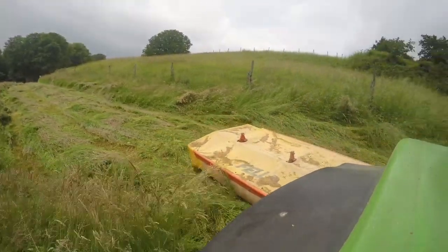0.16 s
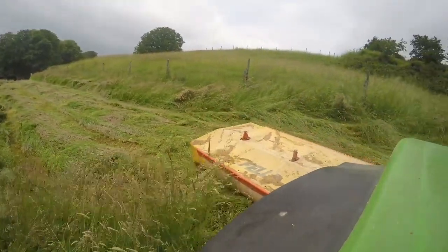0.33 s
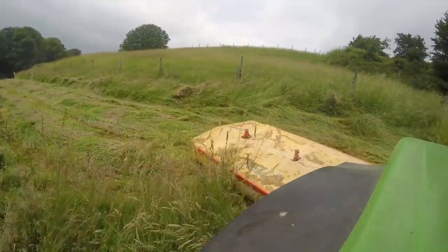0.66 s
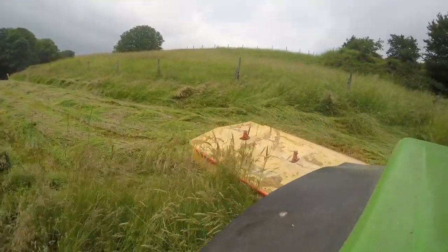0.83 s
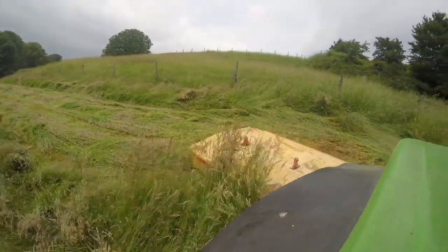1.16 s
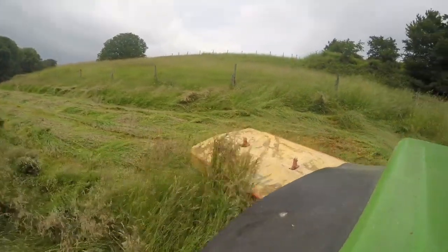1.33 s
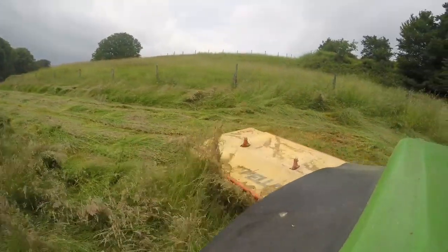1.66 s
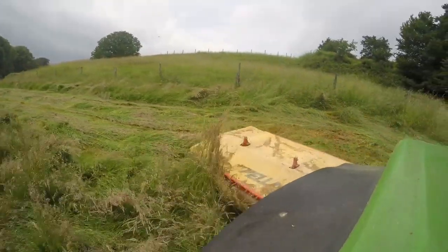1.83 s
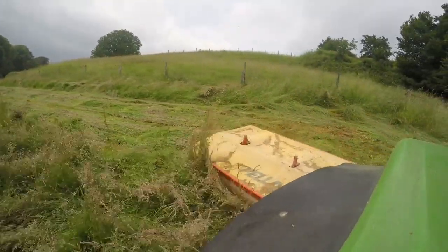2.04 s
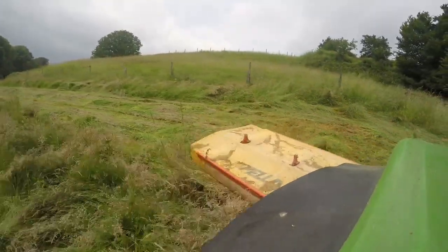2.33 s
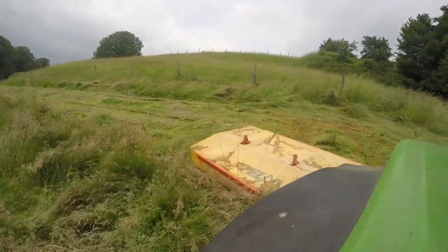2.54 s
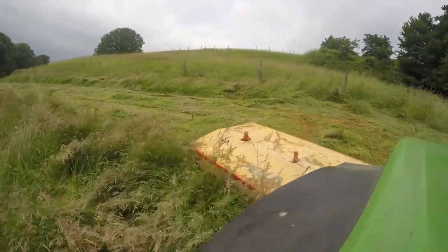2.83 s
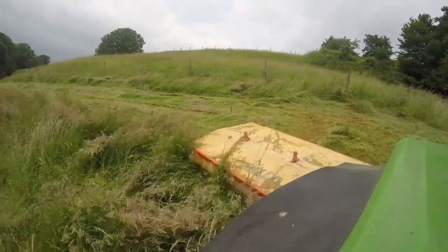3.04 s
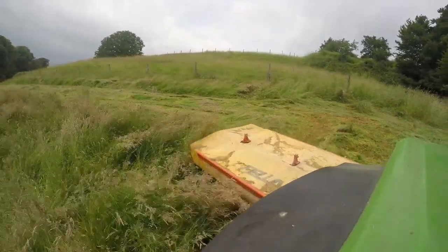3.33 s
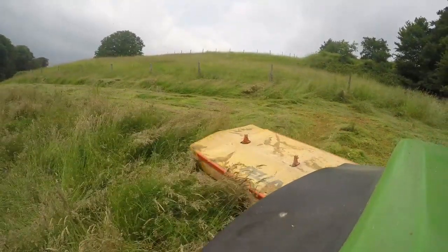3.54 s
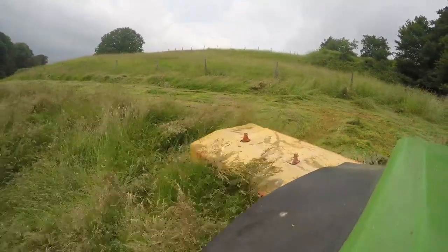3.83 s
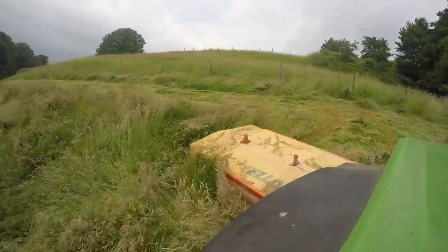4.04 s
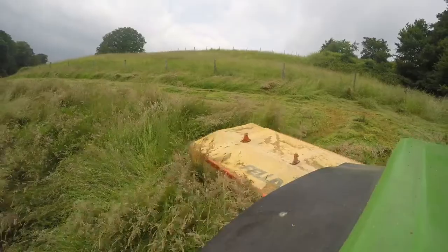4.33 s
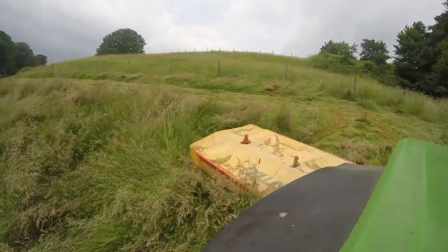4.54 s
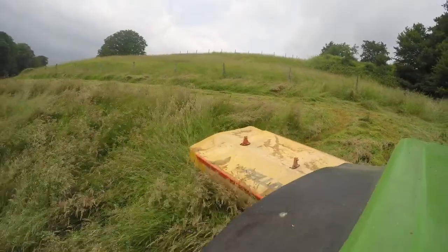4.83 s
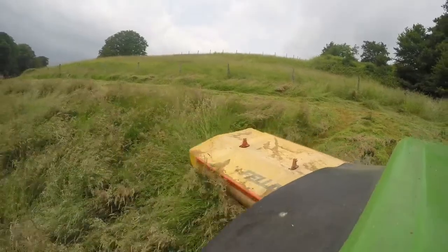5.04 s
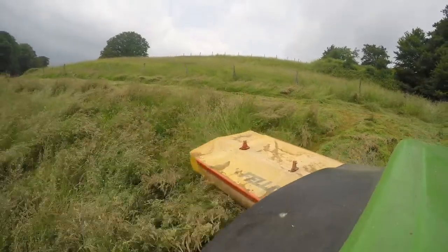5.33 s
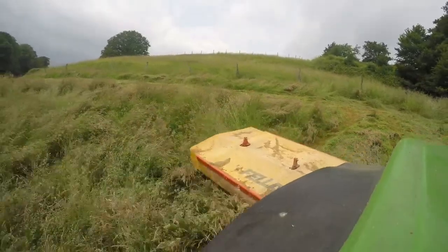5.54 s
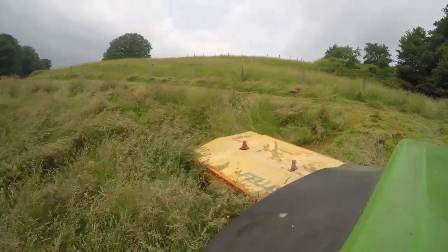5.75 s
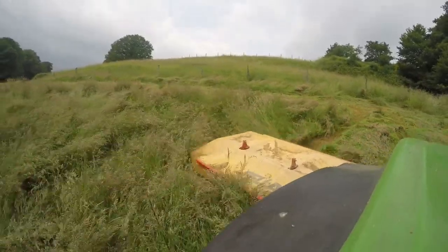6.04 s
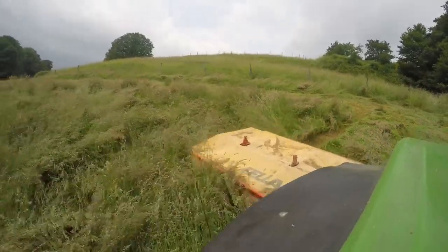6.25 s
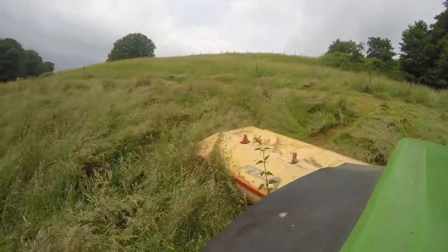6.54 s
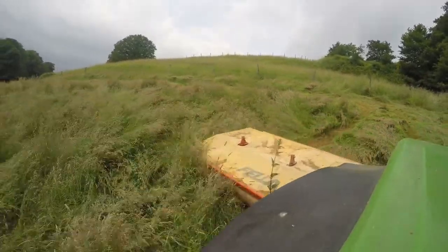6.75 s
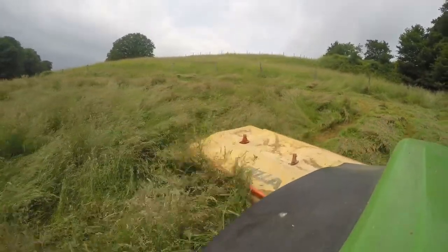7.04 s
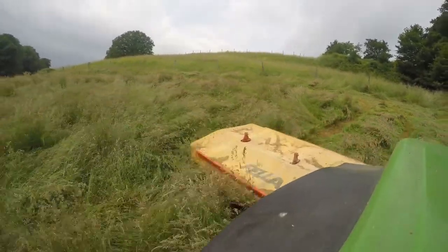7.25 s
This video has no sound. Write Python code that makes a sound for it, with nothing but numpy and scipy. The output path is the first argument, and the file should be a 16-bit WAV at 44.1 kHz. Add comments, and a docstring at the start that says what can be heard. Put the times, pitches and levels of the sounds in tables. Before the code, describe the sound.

A continuous, dense, close mono sound of a working diesel tractor pulling a mower. Deep rumble, rapid firing pulses and rough mid roar swell slightly with thick grass. After about two seconds a clear whine locks on with brief gaps, climbing gently with the engine. Thin steel ringing and faint grass hiss sit on top; two tiny squeaks come near the end. Dry outdoor space.

```python
"""Diesel tractor mowing a meadow

A four-cylinder tractor gains speed, on the whole, as it pulls a disc mower; it is heard from its own body.
Engine orders slide through body resonances, and line up into a thud each cycle that tightens and loosens.
The driveline whines in spells and gears sing, as sines locked to the same crankshaft.
Shaped noise makes the rumble, roar, clatter, steel ring and cut grass; two faint squeaks come near the end.
"""
import sys
import numpy as np
from scipy import signal
from scipy.fft import rfft, irfft, next_fast_len
from scipy.io import wavfile
from scipy.ndimage import uniform_filter1d, minimum_filter1d

SR = 44100
rng = np.random.default_rng(int(sys.argv[2]) if len(sys.argv) > 2 else 0)


def unload_audio(sound):
    """Save the sound as a 16-bit wav file, at the path given as the first command line argument."""
    columns = np.transpose(np.atleast_2d(sound))
    # keep every value between -1 and 1, then stretch to whole-number steps
    steps = np.round(np.clip(columns, -1, 1) * 32767)
    wavfile.write(sys.argv[1], SR, steps.astype(np.int16))


N = 325899
TIME = np.arange(N) / SR  # s

# swell of the roar at each cylinder's firing, in order: swell_db
CYLINDER_SWELL = (0.19, 2, 0.81, -0.097)
# how thick the grass stands, before each layer takes its share: time_s, relative_db
GRASS_THICKNESS = [(0, 0.5), (.4, -1), (.78, 1.4), (1.15, -1), (1.7, 1), (2.15, 0), (2.4, 0), (2.95, 1.1),
                   (3.3, 0.1), (3.72, -2), (4.2, 1.1), (4.55, 0.8), (4.95, -0.8), (5.35, -0.1), (5.9, -0.2),
                   (6.3, 0.5), (7.39, 1.1)]


def amp(db):
    """Decibels to gain."""
    return 10 ** (np.asarray(db) / 20)


def unit(x):
    """Scales to rms 1."""
    return x / np.sqrt(np.mean(abs(x) ** 2) + 1e-20)


def curves(table):
    """Each column of a timed table, joined by straight lines."""
    s, *columns = np.transpose(table)
    return [np.interp(TIME, s, c) for c in columns]


def read(points, hz):
    """Reads a spectrum's level in dB on a log-frequency axis."""
    f, db = np.transpose(points)
    return np.interp(np.log(hz + 1), np.log(f), db)


def wander(hz, size=4096):
    """Slow random movement of rms 1, fading out above about hz."""
    f = np.fft.rfftfreq(size, TIME[-1] / size)
    spectrum = rfft(rng.standard_normal(size)) / (1 + (f / hz) ** 2)
    slow = irfft(spectrum)
    return np.interp(TIME, np.linspace(0, TIME[-1], size), unit(slow))


def colour(x, db_of):
    """Gives white noise of rms 1 the density db_of(hz), in dB per Hz."""
    size = next_fast_len(N, True)
    hz = np.fft.rfftfreq(size, 1 / SR)
    return irfft(rfft(x, size) * amp(db_of(hz)), size)[:N] * np.sqrt(SR / 2)


def tone(turns, db):
    """A sine of the given rms level, starting anywhere in its cycle."""
    return np.sqrt(2) * amp(db) * np.sin(2 * np.pi * (turns + rng.random()))


def lift(modes, hz):
    """The dB that a set of resonances adds at hz."""
    return sum(db * np.exp(-.5 * ((hz - f) / width) ** 2) for f, width, db in modes)


def trail(modes, hz):
    """A resonance leads below its centre and trails above it, in proportion to its lift."""
    return sum(db * width * (hz - f) / (width ** 2 + (hz - f) ** 2) for f, width, db in modes)


def swept(response, modes, order, speed):
    """The response that one order meets as the speed carries it through the resonances."""
    speeds = np.linspace(speed.min(), speed.max(), 200)
    return np.interp(speed, speeds, response(modes, order * speeds))


def engine(turns, speed, jitter_cycles=.0009, lag_cycles=.72, spread_cycles=.04, ring_lag=.013,
           growl_order=30, tight_speed=16.5, stray_turns=.06, stray_per_speed=.13):
    """Orders of the cycle add up to a thud; the bodywork delays low ones more and lifts those at resonance."""
    # shaking at each multiple of the engine's cycle, before the body's lift: order, level_db
    shakes = [(2, -35), (4, -27), (6, -50), (7, -44.5), (8, -42.5), (9, -52.5), (10, -46), (11, -44),
              (12, -36.5), (13, -56.5), (14, -53.5), (15, -69.5), (16, -55.5), (17, -65.5), (18, -52),
              (19, -47.5), (20, -43.5), (21, -46), (22, -49.7), (23, -48.5), (24, -49.5), (25, -52),
              (26, -54.5), (27, -54), (28, -56.5), (29, -55), (30, -47), (31, -55), (32, -55), (33, -56),
              (34, -54), (35, -54), (36, -47), (40, -44.5), (54, -43), (56, -40), (58, -47.5), (60, -42.5)]
    # bodywork resonances that the orders slide through: centre_hz, half_width_hz, lift_db
    bodywork = [(34.94, 2.0, 18), (65.75, 2.0, 9), (103, 2.8, 15), (136.3, 5.0, 7.5), (168.7, 2.9, 11),
                (190.75, 9.27, 23.5), (222.5, 9.3, 27), (262.2, 11.1, 27.5), (292.5, 6.9, 8),
                (365, 2.8, 11.5), (412, 6.3, 17.5), (494.2, 32.4, 27.5), (547.5, 16.2, 18), (588, 10.9, 18)]
    turns = turns + jitter_cycles * wander(13)  # no two cycles take quite the same time
    # phases stray least at tight_speed (cycles per s), so the thud is most compact there
    scatter = stray_turns + stray_per_speed * abs(speed - tight_speed)
    out = np.zeros(N)
    for order, db in shakes:
        # the growl order arrives lag_cycles late, and each order below it spread_cycles later still
        delay = order * lag_cycles - .5 * spread_cycles * (order - growl_order) ** 2
        delay = delay + ring_lag * swept(trail, bodywork, order, speed)
        stray = scatter * wander(.2)
        gain = amp(db + swept(lift, bodywork, order, speed))
        out += np.sqrt(2) * gain * np.cos(2 * np.pi * (order * turns - delay + stray))
    return out


def whine(turns, speed, order=52, rest_db=-30.5, catch_s=.04, let_go_s=.03,
          spell_slip_turns=.03, rest_slip_turns=.11, flutter_db=1.5, flutter_hz=22, sway_db=.66, sway_hz=7,
          steady_speed=16.85, beat_depth=.06, beat_per_speed=.45):
    """The driveline's main tone firms up in spells, flutters, and beats with the engine's cycle."""
    # spells in which the driveline catches, levels before beat and flutter: start_s, end_s, level_db
    spells = [(1.83, 2.14, -23), (2.175, 2.477, -21.5), (3.078, 3.388, -20), (3.414, 4.074, -21),
              (4.12, 4.38, -20), (4.483, 5.86, -18.5), (5.9, 5.965, -17.5), (6.028, 6.682, -22),
              (6.893, 7.395, -21.5)]
    db = np.full(N, float(rest_db))
    caught = np.zeros(N)
    for start, end, spell_db in spells:
        catch = np.clip((TIME - start) / catch_s, 0, 1)
        let_go = np.clip(1 - (TIME - end) / let_go_s, 0, 1)
        held = catch * let_go
        db += held * (spell_db - rest_db)
        caught = np.maximum(caught, held)
    # the beat deepens as the engine leaves steady_speed (cycles per s)
    depth = beat_depth + beat_per_speed * abs(speed - steady_speed)
    beat = 1 + depth * np.cos(2 * np.pi * turns)
    # the phase wavers less while the driveline is caught
    slip = (rest_slip_turns + caught * (spell_slip_turns - rest_slip_turns)) * wander(flutter_hz)
    level_db = db + sway_db * wander(sway_hz) + flutter_db * wander(flutter_hz)
    return beat * tone(order * turns + slip, level_db)


def gears(turns, speed, trim_db=-1.0, mesh_order=104.15, backlash_cycles=.00055,
          flutter_db=2.5, flutter_hz=6, chatter_db=2, rock=.37):
    """Tooth meshes ring in the gearbox, blurred by the play between teeth; firings rock one bright mesh."""
    # faint gear tones, before trim and the casing's lift: order, level_db
    gear_tones = [(62, -58.5), (63, -58.5), (76, -62), (78, -50), (82, -53.5), (85, -61), (90, -46),
                  (100, -56.5), (108, -57), (120, -62.5), (130, -64.5), (142, -52), (331.2, -71.5)]
    # gearbox resonances in which a passing tone sings out: centre_hz, half_width_hz, lift_db
    casing = [(1034, 26, 14.5), (1277, 17.5, 19), (1413, 2.7, 11), (1590, 19, 7), (1689.5, 53, 16),
              (1890, 18, 7), (1978, 30, 22.5), (2166, 54, 13), (2345, 11, 7.5), (5370, 100, 6)]
    # level of the bright mesh, before chatter and rocking: time_s, level_db
    mesh_level = [(0, -36.5), (.8, -37), (1.3, -31), (1.7, -38.5), (2, -33), (2.5, -44), (3.4, -34),
                  (3.8, -39.5), (4.8, -38.5), (5.6, -51.5), (6.3, -45.5), (7.39, -49)]
    turns = turns + backlash_cycles * wander(29)
    faint = np.zeros(N)
    for order, db in gear_tones:
        level_db = db + swept(lift, casing, order, speed) + flutter_db * wander(flutter_hz)
        faint += tone(order * turns, level_db)
    mesh = tone(mesh_order * turns, curves(mesh_level)[0] + chatter_db * wander(23))
    rocking = 1 + rock * np.cos(2 * np.pi * len(CYLINDER_SWELL) * turns)
    return amp(trim_db) * faint + mesh * rocking


def rush(turns, speed, rumble_trim_db=2.5, knock=.47, knock_decay_firings=.15, tick=.68, patchy_db=.6,
         rumble_follow=1.1, roar_follow=.78, clatter_follow=.8, ease_db_per_speed=1.4,
         low_hz=330, high_hz=1150):
    """Chassis rumble, a roar that swells with each cylinder, and knocks and ticks ring in the panels."""
    # rush of engine, fan and mower, before panels and band edges: pitch_hz, density_db_per_hz
    rush_spectrum = [(15, -55.5), (65, -54), (110, -69), (160, -63), (320, -63), (410, -54.5), (650, -60.5),
                     (1040, -58), (1220, -70), (1550, -66), (2200, -71), (2900, -77), (3400, -84.5),
                     (4500, -88), (7000, -106)]
    # panels and cavities that the rush rings in: centre_hz, half_width_hz, lift_db
    panels = [(195.3, 22.4, 19), (260, 20, 9.5), (485.4, 29, 10.5), (563, 32.5, 14.5), (724, 35, 5),
              (886, 34.6, 11), (1706, 70, 8.5), (1962, 40, 6.5), (3730, 98, 4), (4090, 130, 4.5)]

    def band(lo, hi):
        """The panel-lifted spectrum between two soft edges in Hz."""
        def db_of(hz):
            edges = (1 + (lo / (hz + 1)) ** 8) * (1 + (hz / hi) ** 8)
            return read(rush_spectrum, hz) + lift(panels, hz) - 10 * np.log10(edges)
        return db_of

    count = len(CYLINDER_SWELL)
    firing = count * turns
    swell_db = np.interp(firing, np.arange(count), CYLINDER_SWELL, period=count)
    # one knock a firing, and four valve ticks, the first of them on the knock
    knocks = knock * np.exp(-(firing % 1) / knock_decay_firings)
    ticks = tick * np.cos(np.pi * count * firing) ** 2
    load_db, = curves(GRASS_THICKNESS)  # thick grass makes all three swell
    labour_db = ease_db_per_speed * (speed.max() - speed)  # the slower the engine, the harder it clatters
    clatter_db = labour_db + clatter_follow * load_db + patchy_db * wander(40)
    rumble = unit(rng.standard_normal(N) * amp(rumble_follow * load_db))
    roar = unit(rng.standard_normal(N) * amp(roar_follow * load_db + swell_db))
    clatter = unit(rng.standard_normal(N) * (1 + knocks + ticks) * amp(clatter_db))
    return (amp(rumble_trim_db) * colour(rumble, band(10, low_hz))
            + colour(roar, band(low_hz, high_hz))
            + colour(clatter, band(high_hz, 8000)))


def mower(turns, order=2.6, level_db=-29.5, sway_db=3, drift_turns=.042):
    """The spinning discs shake the mower's cover with an unsteady drone."""
    return tone(order * turns + drift_turns * wander(.89), level_db + sway_db * wander(2.7))


def steel(ring_hz=4066, width_hz=34, waver_db=.5):
    """A thin steel part, kept ringing by the shaking: noise through one narrow resonance."""
    # level of the steel ring: time_s, level_db
    ring_level = [(0, -68), (.8, -53.5), (1.7, -53), (3.3, -56.5), (4.1, -60), (4.9, -57), (5.35, -52),
                  (6.2, -52.5), (7.39, -58.5)]

    def resonance_db(hz):
        return -20 * np.log10(1 + ((hz - ring_hz) / (2 * width_hz)) ** 2)

    ring = colour(rng.standard_normal(N), resonance_db)
    return amp(curves(ring_level)[0]) * unit(ring * amp(waver_db * wander(2.8)))


def grass(patchy_db=.9):
    """Countless stalks, cut and swept along the cover in clumps, hiss as patchy noise."""
    # hiss of cut grass: pitch_hz, density_db_per_hz
    hiss = [(2000, -110), (4500, -100.5), (5400, -99.5), (6100, -93), (6550, -98.5), (6950, -92),
            (7400, -99), (8200, -103), (9000, -101), (10800, -102), (11700, -108), (12400, -104),
            (14300, -119)]
    clumps_db = curves(GRASS_THICKNESS)[0] + patchy_db * wander(50)
    stalks = unit(rng.standard_normal(N) * amp(clumps_db))
    return colour(stalks, lambda hz: read(hiss, hz))


def squeaks(fall=.01):
    """Each sine swells, sags in pitch by the fraction fall and is gone."""
    # faint high squeaks, pitch at mid-length and level at the crest: start_s, length_s, pitch_hz, level_db
    squeak_events = [(6.595, 0.04, 7680, -56), (7.027, .055, 7670, -59)]
    out = np.zeros(N)
    for start, length, hz, db in squeak_events:
        along = np.clip((TIME - start) / length, 0, 1)
        pitch_hz = hz * (1 - fall * (along - .5))
        out += np.sin(np.pi * along) ** 2 * tone(np.cumsum(pitch_hz) / SR, db)
    return out


def scene():
    """One crankshaft sets every order's pitch; the open field gives no echo."""
    # engine speed, in four-stroke cycles: time_s, cycles_per_s
    engine_speed = [(0, 15.888), (0.75, 15.974), (1.25, 16.419), (1.5, 16.476), (2, 16.563), (2.5, 16.669),
                    (3, 16.624), (3.5, 16.756), (4, 16.943), (4.25, 16.846), (4.5, 16.879), (5, 17.0),
                    (5.25, 17.049), (5.75, 17.397), (6, 17.441), (6.25, 17.389), (7, 17.43), (7.39, 17.396)]
    speed, = curves(engine_speed)
    turns = np.cumsum(speed) / SR  # engine cycles so far
    tractor = engine(turns, speed) + whine(turns, speed) + gears(turns, speed) + rush(turns, speed)
    return (tractor + mower(turns) + steel() + grass() + squeaks())[None]


def record(dry, ceiling=.87, size=300, edge_hz=14300):
    """A quick limiter holds the highest peaks down; the ends are softened; a low-pass limits the band."""
    needed = np.minimum(1, ceiling / (abs(dry) + 1e-9))
    gain = minimum_filter1d(needed, 2 * size)  # size in samples
    smooth_gain = uniform_filter1d(uniform_filter1d(gain, size), size)
    soft = dry * smooth_gain * signal.windows.tukey(N, .002)
    low_pass = signal.firwin(255, edge_hz, window=("kaiser", 9), fs=SR)
    return signal.oaconvolve(soft, low_pass[None], "same")


dry = scene()
out = record(dry)
unload_audio(out)
```